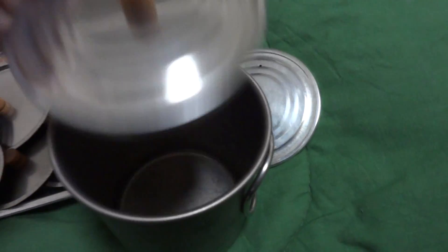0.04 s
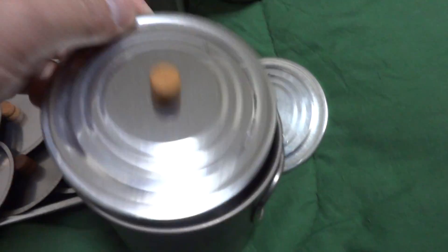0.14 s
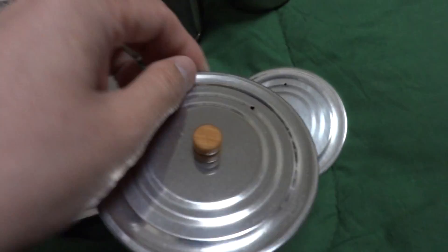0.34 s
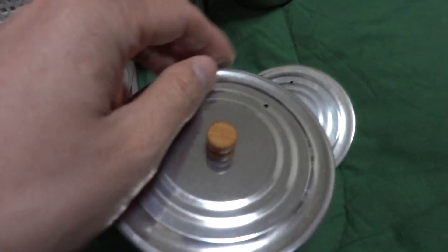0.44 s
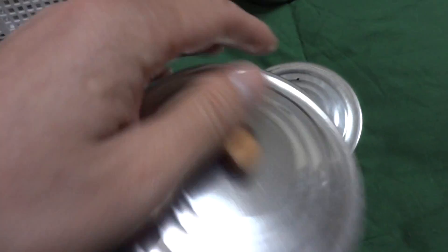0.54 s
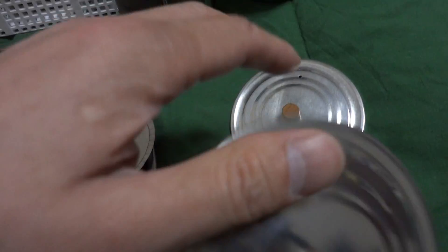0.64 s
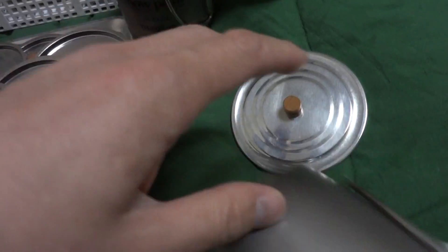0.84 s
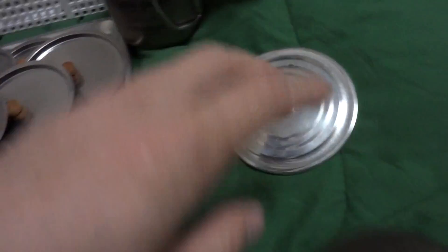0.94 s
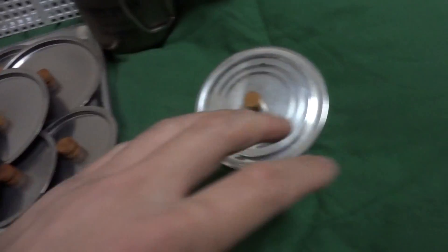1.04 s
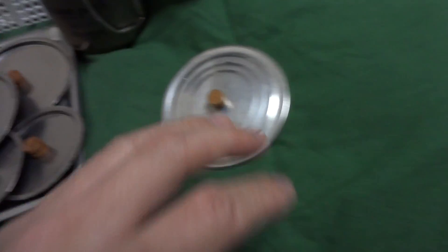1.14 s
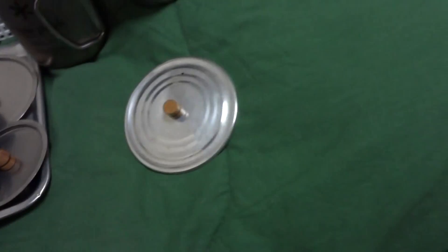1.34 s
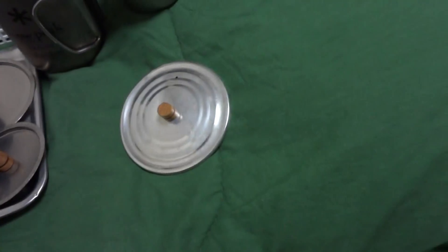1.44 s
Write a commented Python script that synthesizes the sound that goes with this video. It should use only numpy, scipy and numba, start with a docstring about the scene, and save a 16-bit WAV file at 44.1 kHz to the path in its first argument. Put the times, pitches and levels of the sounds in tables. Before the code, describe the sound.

A metal lid clanks onto a pot and scrapes, then loose lids rattle.

```python
"""A small room with a faint whine. A thin metal lid drops on a steel pot and slides home; its handle
clinks, the pot is pushed aside against a tray of lids, and two loose lids clatter.
Knocks and stick-slip scrapes set each object ringing: a few clear modes over a crowd of weak ones.
Dull bumps add weight, one bright tick cuts through, and a limiter flattens the loud moments."""
import sys
import numpy as np
from scipy import signal
from scipy.fft import rfft, irfft
from scipy.io import wavfile
from scipy.ndimage import uniform_filter1d, minimum_filter1d
from numba import njit

SR = 44100
rng = np.random.default_rng(int(sys.argv[2]) if len(sys.argv) > 2 else 0)


def master_out(mix):
    """Clip the mix to full scale and print it as 16-bit PCM to the path in sys.argv[1]."""
    frames = np.transpose(np.atleast_2d(mix))
    ceiling = np.clip(frames, -1, 1)
    pcm = np.round(ceiling * 32767).astype(np.int16)
    wavfile.write(sys.argv[1], SR, pcm)


N = 66150
BASS_HZ, BODY_HZ, NEUTRAL_HZ, TREBLE_HZ = 284, 579, 1850, 7300
OPPOSITE = np.array([[1], [-1]])  # left up, right down


def cookware():
    """Knocks and scrapes push on each object, and it answers with its own ring."""
    rings = {name: metal_ring(name) for name in MODES}
    hits, slides = knocks(), scrapes()
    return sum(signal.fftconvolve((hits[name] + slides[name])[None], ring, axes=1)[:, :N]
               for name, ring in rings.items())


# The hits. Each row: start in seconds, object, level in dB, then bass, body and treble boost in dB.
KNOCKS = [ (.2065, "lid", -16, -9, 17.5, -6.5), (.2140, "lid", -17.5, -7.5, 3, -32),
          (.3450, "lid", -18.5, 5.5, 9, 3.5), (.3770, "lid", -25, 17.5, 7, 9),
          (.5575, "handle", -33, -1.5, -1.5, -4.5), (.5975, "lid", -33.5, 10, -2, -12),
          (.6950, "pot", -26.5, 10.5, 4.5, 2.5), (.8030, "pot", -22, 0, -19, 1.5),
          (.8360, "loose", -22, -1, 0, 7.5), (.8810, "loose", -15, -8.5, -7.5, -12),
          (.9910, "loose", -28.5, -2.5, -1, -6), (1.0055, "small", -22, -22, 5.5, 4),
          (1.0440, "small", -30, -3, -32, 4.5), (1.0655, "small", -8, -20, 0, -7.5),
          (1.0860, "small", -13.5, -0.5, 9, -7), (1.0960, "loose", -20.5, 7.5, -5.5, 0.5),
          (1.1080, "loose", -16.5, -35.5, -6, -2), (1.1240, "loose", -34, 9.5, 11.5, -8),
          (1.1420, "loose", -19, 5.5, 0, 5), (1.2200, "loose", -27.5, -2.5, -4.5, -5)]

def knocks():
    """The force on each object as metal strikes metal: one short push a hit."""
    force = {name: np.zeros(N) for name in MODES}
    for start, name, db, *tone in KNOCKS:
        add(force[name], start, undb(db) * contact(*tone))
    return force


# The slides. Each row: start in seconds, object, swell and hold in seconds, level in dB,
# then bass, body and treble boost in dB.
SCRAPES = [ (0.171, "lid", 0.024, 0.022, -46.5, -9.5, 19.5, -0.5),
           (.216, "lid", 0.002, 0.022, -20, -16.5, 6, -9), (.245, "lid", 0.015, 0.12, -21, -12, -26, -19.5),
           (.298, "lid", 0.023, 0.049, -14.5, -3, 1, -6.5), (0.695, "pot", 0.0087, 0.029, -20, 8, -11, 0.5),
           (0.813, "pot", 0.012, 0.073, -16, 0, -17.5, -5),
           (0.859, "loose", 0.018, 0.076, -26, -5.5, -5.5, -7.5),
           (1.005, "small", 0.002, 0.02, -25.5, -10.5, -33, 0.5),
           (1.071, "loose", 0.0278, 0.0582, -21.5, -1.5, -1.5, -2.5),
           (1.138, "loose", 0.0058, 0.023, -30.5, 4.5, -6, 11.5)]

def scrapes():
    """The force on each object as a rim drags: every slip is a tiny contact."""
    force = {name: np.zeros(N) for name in MODES}
    for start, name, swell, hold, db, *tone in SCRAPES:
        add(force[name], start, undb(db) * signal.fftconvolve(stick_slip(swell, hold), contact(*tone)))
    return force


def stick_slip(swell_s, hold_s, release_s=.0026, slips_per_s=800, scatter_db=5):
    """A rim sticks and slips at random while the pressure swells, holds and lets go."""
    t = np.arange(N // 4) / SR
    slipping = rng.random(len(t)) < slips_per_s / SR
    strength = undb(scatter_db * np.clip(rng.standard_normal(len(t)), -2, 2))
    direction = rng.choice([-1, 1], len(t))
    grit = unit(slipping * strength * direction) / np.sqrt(SR * .02)  # unit energy per 20 ms
    pressure = np.minimum(t / swell_s, 1) * np.exp(-np.maximum(t - swell_s - hold_s, 0) / release_s)
    return grit * pressure


def contact(bass_db, body_db, treble_db):
    """The push of one contact: a flat landing is dull, a rim on a rim is bright."""
    return response([(BASS_HZ, bass_db), (BODY_HZ, body_db), (NEUTRAL_HZ, 0), (TREBLE_HZ, treble_db)])


# Each object's clear notes. Each row: pitch in Hz, level in dB, seconds to die away by 60 dB.
MODES = { "lid": [(490, -21, .25), (552, -11, .1), (1270, -12, .13), (1460, -18, .2), (2320, -12, .13),
         (3450, -11, .19), (3535, -10, .18), (3785, -10, .18), (5410, -11, .13), (5595, -11, .16),
         (7370, -13, .15), (9430, -12, .13)], "pot": [(275, -12, .15), (925, -14, .15), (1385, -13, .22),
         (2175, -23, .25), (3460, -16, .22), (3778, -17, .2), (7190, -21, .25), (7372, -17, .18),
         (8660, -15, .25), (9380, -14, .14)], "handle": [(3470, -9, .13), (3779, -13, .18), (4915, -9, .07),
         (5410, -10, .09), (7185, -14, .42), (8700, -8, .3), (8890, -13, .42)], "loose": [(400, -17, .25),
         (789, -7, .32), (1312, -10, .33), (1332, -21, .45), (2062, -40, 1.6), (2170, -21, .22),
         (3520, -13, .12), (3790, -12, .16), (7050, -13, .15), (8930, -17, .16)], "small": [(765, -16, .2),
         (1312, -13, .3), (2166, -11, .34), (4273, -17, .25), (4565, -12, .4), (11348, -21, .18)]}

def metal_ring(name, twin_db=-8, max_detune=.004, reflections_db=-18.5):
    """One tap's stereo ring; the object is not quite round, so each mode beats with a weaker twin."""
    phase_per_hz = 2 * np.pi * np.arange(N) / SR
    notes = np.zeros(N)
    for hz, db, t60 in MODES[name]:
        twin_hz = hz * (1 - max_detune * rng.random())
        beating = np.sin(hz * phase_per_hz) + undb(twin_db) * np.cos(twin_hz * phase_per_hz)
        notes += np.sqrt(2) * undb(db) * fade(t60) * beating
    reflections = undb(reflections_db) * highpass(mode_crowd(name), hz=250)
    direct = highpass(notes + mode_crowd(name), hz=140)  # thin sheet radiates little bass
    return pan(direct, name) + reflections * OPPOSITE


# The wash between the clear notes, by object. Each row: frequency in Hz, relative level in dB.
CROWD_COLOUR = { "lid": [(90, -37), (250, -5), (350, -20.5), (560, -1), (1000, -13.5), (1300, -2),
                (1650, -20), (2330, -5), (2650, -10.5), (3250, -9.5), (3600, 1.5), (4200, -9.5), (6200, -5),
                (11000, -6.5), (13500, -14.5), (15500, -15.5)], "pot": [(70, -28), (190, -22), (285, -5),
                (400, -13), (700, 9.5), (1400, 3.5), (1800, -15.5), (2700, -10.5), (3500, -4), (4200, -8.5),
                (6200, -3.5), (11000, -6.5), (13500, -17.5), (15500, -4.5)], "loose": [(70, -19),
                (160, -8.5), (330, 8), (720, 8), (1000, -3), (1330, 0.5), (1700, -6), (2800, -8),
                (3700, -2.5), (11000, -2.5), (13500, -14), (15500, -8)]}

def mode_crowd(name, cluster_hz=110, cluster_db=3.2, crack_db=-.5, crack_s=.0095):
    """Countless weak modes: a crack as the sheet first flexes, then a decay in each register."""
    colour = CROWD_COLOUR.get(name, CROWD_COLOUR["loose"])  # also for the small lid and the handle
    spectrum = rfft(noise(colour))
    pitch = np.log(np.maximum(np.arange(len(spectrum)) * SR / N, 1))
    registers, t60s = np.log([BASS_HZ, NEUTRAL_HZ, TREBLE_HZ]), (.23, .24, .2)
    # The modes bunch into narrow clusters, most of all in the treble.
    clusters = unit(uniform_filter1d(rng.standard_normal(len(spectrum)), int(cluster_hz * N / SR)))
    spectrum *= undb(cluster_db * clusters * np.interp(pitch, registers, [0, .5, 1]))
    ring = sum(irfft(spectrum * np.interp(pitch, registers, share), N) * fade(t60)
               for share, t60 in zip(np.eye(3), t60s))
    crack = undb(crack_db) * np.exp(-np.arange(N) / SR / crack_s)
    return ring * (1 + crack)


# The thuds under the clatter. Each row: start in seconds, pitch in Hz, level in dB.
BUMPS = [(.2065, 864, -7.5), (.5565, 587, -20), (.5970, 740, -29.5), (.7985, 775, -12), (.9905, 613, -20),
         (1.0050, 773, -5.5), (1.0430, 680, -16.5), (1.101, 423, -3.5), (1.2100, 403, -16.5)]

def bumps(rise_s=.0015):
    """A lid damped by hand or cloth: a dull tone swells and dies within a few cycles."""
    out, t = np.zeros(N), np.arange(N) / SR
    envelope = t / rise_s * np.exp(1 - t / rise_s)
    for start, hz, db in BUMPS:
        add(out, start, undb(db) * envelope * np.sin(2 * np.pi * hz * t))
    return pan(highpass(out, hz=330), "loose")


# Where things sit. Each entry: object, lean of its mid range in dB (positive is left).
LEAN_DB = {"lid": 0.5, "handle": 0.5, "pot": -2, "loose": -3.5, "small": -4}

def pan(x, name):
    """Place an object in stereo: mainly its mid range leans to one side."""
    mids = signal.sosfilt(signal.butter(1, (570, 3400), "band", fs=SR, output="sos"), x)
    return x + mids * (undb(OPPOSITE * LEAN_DB[name] / 2) - 1)


def tick(start_s=.9655):
    """A lone bright tick that does not ring."""
    impulse = np.zeros(N)
    add(impulse, start_s, undb([3]))
    return signal.sosfilt(signal.butter(2, (8500, 15800), "band", fs=SR, output="sos"), impulse)


# The dark bed of room air. Each row: frequency in Hz, relative level in dB.
AIR_COLOUR = [(30, -28), (110, -12), (175, -5), (300, -12), (700, -18), (860, -12), (1050, -24),
              (15000, -49)]

def room_tone(air_db=-48, width_db=-13.5, whine_hz=874.5, whine_db=-51.5, waver_depth=.25):
    """Quiet air and a whine that wavers in level, as of a small fan."""
    waver = unit(uniform_filter1d(uniform_filter1d(rng.standard_normal(N), size=2000), size=2000))
    tone = np.sqrt(2) * np.sin(2 * np.pi * whine_hz * np.arange(N) / SR)
    whine = (1 + waver_depth * waver) * tone
    air = noise(AIR_COLOUR) + undb(width_db) * noise(AIR_COLOUR) * OPPOSITE
    return undb(whine_db) * whine + undb(air_db) * air


def undb(db):
    """Decibels to gain."""
    return 10 ** (np.asarray(db) / 20)


def unit(x):
    """Scale to rms 1."""
    return x / np.sqrt(np.mean(x ** 2))


def response(points, size=2048):
    """Minimum-phase impulse response of a (Hz, dB) curve."""
    hz, db = np.array(sorted(points)).T
    freqs = np.maximum(np.arange(size // 2 + 1) * SR / size, 1)
    gain = undb(np.interp(np.log(freqs), np.log(hz), db))
    cepstrum = irfft(np.log(gain))
    cepstrum[1:size // 2] *= 2
    cepstrum[size // 2 + 1:] = 0
    return irfft(np.exp(rfft(cepstrum)))


def noise(colour):
    """Noise of rms 1 with a (Hz, dB) colour."""
    return unit(irfft(rfft(rng.standard_normal(N)) * rfft(response(colour), N), N))


def fade(t60):
    """A tail that falls 60 dB in t60 seconds."""
    return np.exp(-np.log(1000) * np.arange(N) / SR / t60)


def highpass(x, hz):
    """Second-order low cut."""
    return signal.sosfilt(signal.butter(2, hz, "high", fs=SR, output="sos"), x)


def add(out, start_s, x):
    """Mix x into out from a given time."""
    i = int(start_s * SR)
    out[i:i + len(x)] += x[:len(out) - i]


@njit
def follow_peaks(x, release):
    """An envelope that jumps to each peak and sinks back."""
    out, level = np.empty(len(x)), 0.
    for i in range(len(x)):
        level = max(x[i], level - level * release)
        out[i] = level
    return out


def scene():
    """The cookware in the quiet room."""
    return room_tone() + cookware() + bumps() + tick()


def record(dry, limit_db=-6.5, ahead_s=.0013, release_s=.013, top_hz=15800):
    """A look-ahead limiter holds the clatter down, then a steep filter cuts the very top."""
    peak = follow_peaks(np.abs(dry).max(axis=0), 1 / (SR * release_s))
    needed_gain = np.minimum(1, undb(limit_db) / (peak + 1e-9))
    span = 2 * int(ahead_s * SR) + 1
    gain = uniform_filter1d(minimum_filter1d(needed_gain, span), span)
    return signal.sosfilt(signal.ellip(10, .2, 80, top_hz, fs=SR, output="sos"), dry * gain)


dry = scene()
out = record(dry)
master_out(out)
```